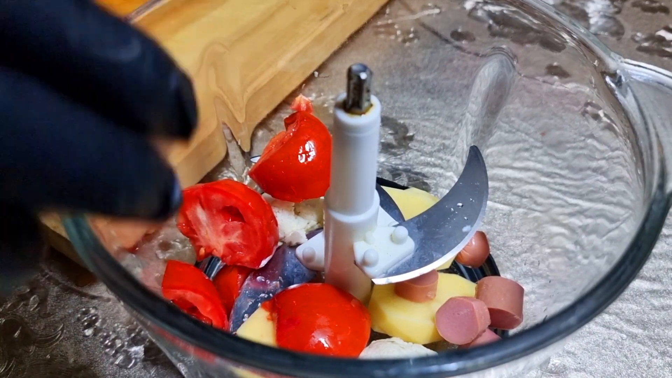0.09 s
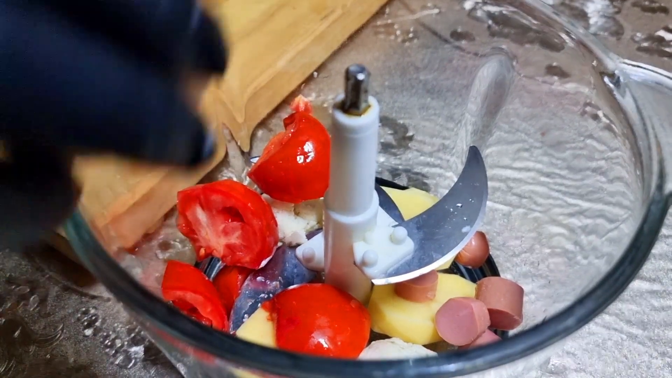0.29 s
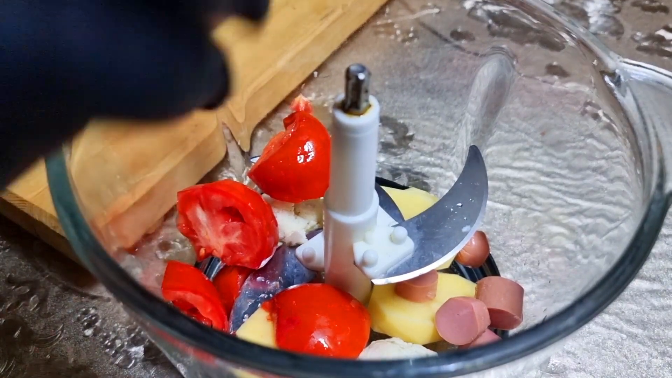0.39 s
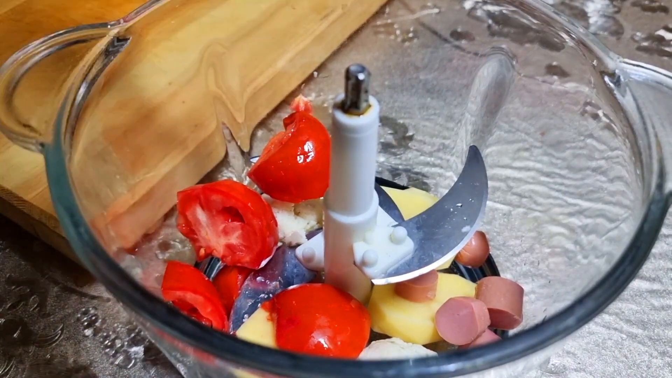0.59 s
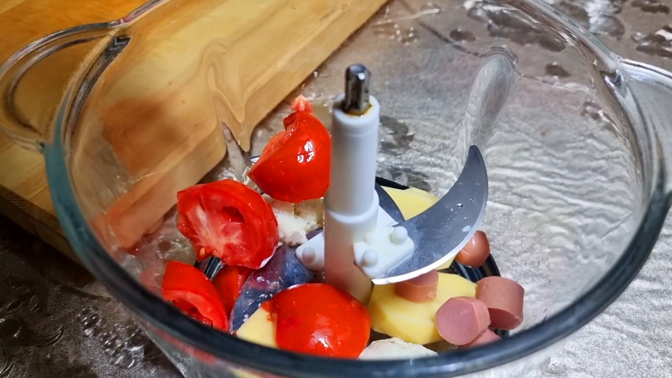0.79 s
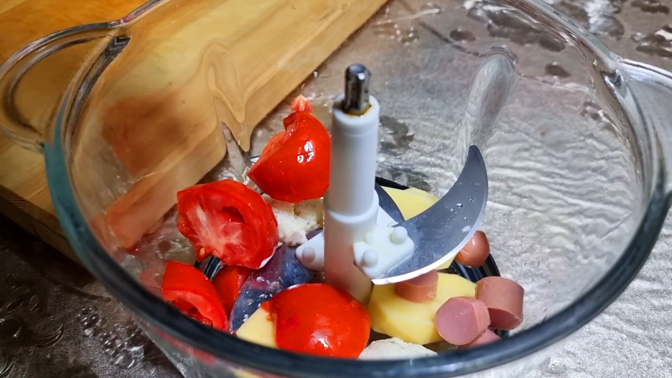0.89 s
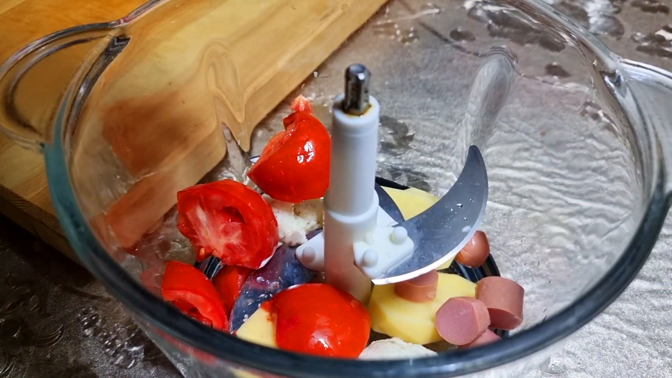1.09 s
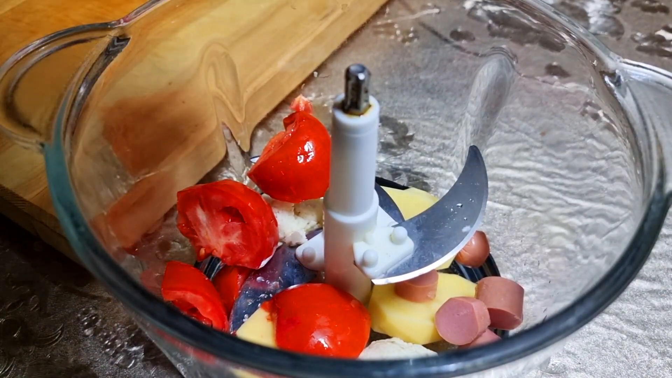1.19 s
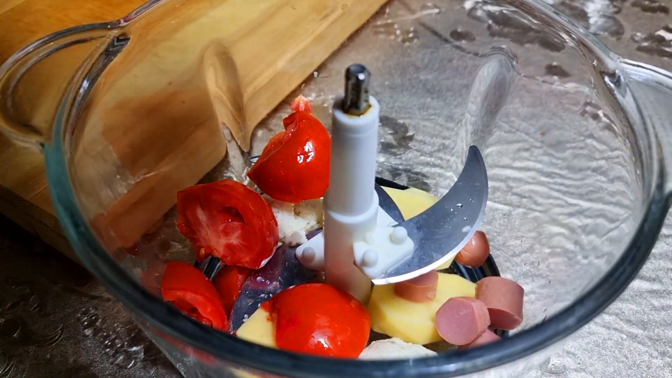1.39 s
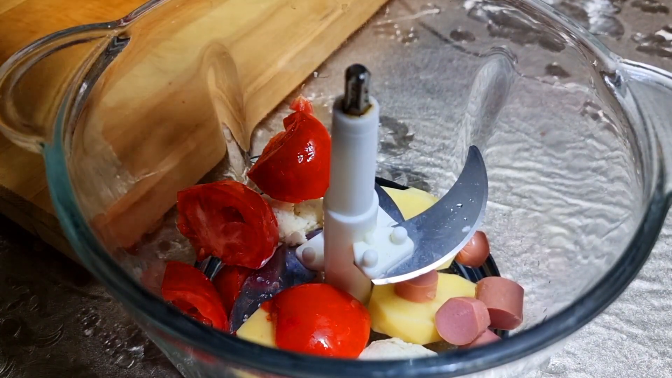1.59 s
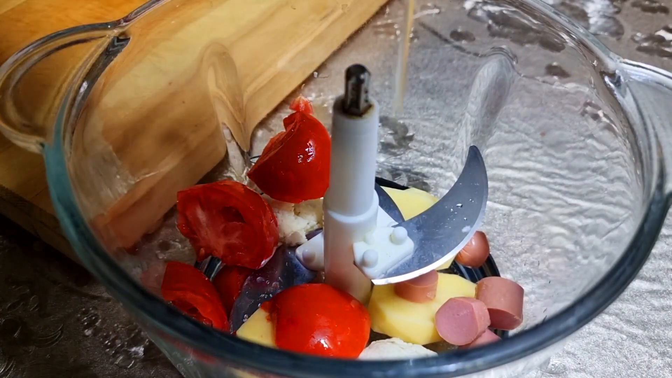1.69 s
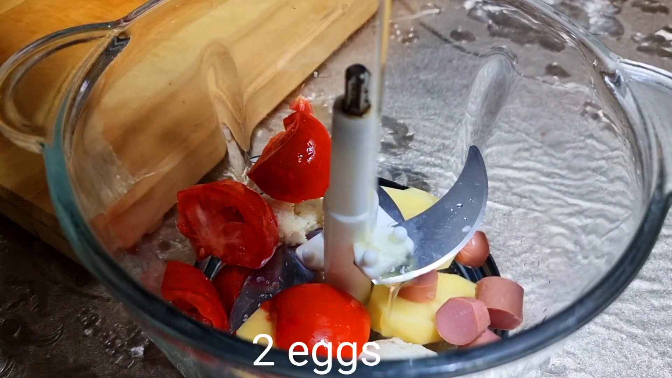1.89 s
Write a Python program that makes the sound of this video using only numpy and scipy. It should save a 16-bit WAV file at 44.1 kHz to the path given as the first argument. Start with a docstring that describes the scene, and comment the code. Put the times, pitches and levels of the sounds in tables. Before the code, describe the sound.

Close up in a quiet, softly hissing kitchen, two quick egg knocks make a glass bowl clink and ring, the second with a crisp crack; about a second later the shell crackles apart in short bursts.

```python
"""A quiet kitchen hisses softly, made of coloured noise, with faint rubs as fingers shift on an egg.
The egg is knocked twice on the rim of a glass chopper bowl: fading sine waves make the glass ring, its
lowest pair beating, over a noisy clatter and a worktop thump. The second knock breaks the shell.
About a second later thumbs pull the shell apart in short runs of dry snaps, each a click with a noisy
crumble that rings a small piece of shell."""
import sys
import numpy as np
from scipy import signal
from scipy.fft import rfft, irfft, next_fast_len
from scipy.io import wavfile

SR = 44100
rng = np.random.default_rng(int(sys.argv[2]) if len(sys.argv) > 2 else 0)


def dump(signal):
    """Clip the signal to [-1, 1] and save it as 16-bit WAV at the path in sys.argv[1]."""
    limited = np.clip(np.atleast_2d(signal).T, -1, 1)
    pcm = np.round(limited * 32767).astype(np.int16)
    wavfile.write(sys.argv[1], SR, pcm)


N = 83790
T = np.arange(N) / SR  # time of every sample [s]

# Knocks of the egg on the rim: (time [s], worktop thump level [dB], shell crack level [dB])
KNOCKS = [(0.2164, -20, -26), (0.3864, -20, -8)]
AIR_SIDE_DB = 2  # left-right opposed part of the air and finger noise, against the shared part


def from_db(db):
    """Turn decibels into a gain."""
    return 10 ** (np.asarray(db) / 20)


def rms_one(x):
    """Scale to an rms (average strength) of one."""
    return x / np.sqrt(np.mean(x ** 2) + 1e-20)


def since(s):
    """Seconds passed since a moment, zero before it."""
    return np.maximum(T - s, 0)


def ring_out(t, rise_s, t60):
    """Quick swell, then a steady fall of 60 dB every t60 seconds."""
    swell = 1 - np.exp(-t / rise_s)
    return swell * from_db(-60 * t / t60)


def panned(pan_db):
    """Left and right gains that differ by pan_db."""
    return from_db(np.array([[.5], [-.5]]) * pan_db)


def stereo_noise(side_db, size):
    """White noise: one part shared by left and right, one part opposed."""
    mid, side = rng.standard_normal((2, size))
    return rms_one(mid + from_db(side_db) * side * np.array([[1], [-1]]))


def colour(x, points, tilt_db=0):
    """Filter through (Hz, dB) points, tilted per octave, with no sound ahead of time; white noise keeps its level."""
    n = 2 * next_fast_len(x.shape[-1])
    octave = np.log2(np.maximum(np.arange(n // 2 + 1) * SR / n, 1))
    hz, db = np.transpose(points)
    tilted_db = db + tilt_db * np.log2(hz / hz[0])
    gain = rms_one(from_db(np.interp(octave, np.log2(hz), tilted_db)))
    # Folding the cepstrum forward in time gives the minimum-phase filter with this gain
    cepstrum = irfft(np.log(gain))
    cepstrum[1:n // 2] *= 2
    cepstrum[n // 2 + 1:] = 0
    response = np.exp(rfft(cepstrum))
    return irfft(rfft(x, n) * response)[..., :x.shape[-1]]


def add(out, s, sound):
    """Mix a short sound in at a moment, cut off at the end of the scene."""
    i = min(int(s * SR), N - 1)
    out[:, i:i + sound.shape[-1]] += sound[:, :N - i]


def air():
    """Room air: steady noise, coloured into a hiss with a little low rumble."""
    # Tone of the room air: (frequency [Hz], relative level [dB])
    air_tone = [(25, -9), (60, -6.5), (110, 5), (180, -6.5), (400, -3.5), (800, 6.5), (1500, 2.5),
                (2600, 1.5), (4200, 3.5), (7000, -2.5), (10000, -4), (11500, -25.5), (16000, -33)]
    level_db = -64
    return from_db(level_db) * colour(stereo_noise(AIR_SIDE_DB, N), air_tone)


def fingers():
    """Fingers sliding on the shell: faint bell-shaped swells of coloured noise."""
    # Rubs: (time of the middle [s], width [s], level [dB])
    rubs = [(.125, 0.023, -59.5), (.585, 0.014, -69), (.79, 0.034, -66), (.908, 0.013, -58),
            (1.04, 0.021, -66.5), (1.11, 0.018, -70.5)]
    # Tone of the rubbing: (frequency [Hz], relative level [dB])
    rub_tone = [(60, -3), (115, 8.5), (220, -11.5), (1500, -3), (5000, 4), (9000, 1), (12000, -21.5),
                (16000, -14)]
    level = sum(from_db(db) * np.exp(-.5 * ((T - s) / width) ** 2) for s, width, db in rubs)
    return level * colour(stereo_noise(AIR_SIDE_DB, N), rub_tone)


def worktop():
    """The bowl shoves the worktop: low modes ring from each knock, and a soft thump peaks just after it."""
    # Worktop modes: (frequency [Hz], first knock level [dB], second knock level [dB], 60 dB fall time [s])
    worktop_modes = [(88, -31, -28, .22), (109.5, -22.5, -23, .26), (215, -20, -31, .24),
                     (240.6, -21, -40.5, 0.25), (385.2, -19, -26.5, 0.074)]
    thump_hz, thump_delay_s, thump_width_s = 130, 0.01315, .0042
    out = np.zeros(N)
    for k, (s, thump_db, _) in enumerate(KNOCKS):
        late = T - s - thump_delay_s  # time from the middle of the thump
        bump = np.exp(-(late / thump_width_s) ** 2)
        out += from_db(thump_db) * bump * np.cos(2 * np.pi * thump_hz * late)
        for hz, first_db, second_db, t60 in worktop_modes:
            level = from_db((first_db, second_db)[k]) * ring_out(since(s), 1 / hz, t60)
            out += level * np.cos(2 * np.pi * hz * late)
    return out


def clatter():
    """Many well-damped modes of bowl, blade and worktop: short noise bands, the lows swelling more slowly."""
    # Clatter: (frequency [Hz], first knock level [dB], second knock level [dB], 60 dB fall time [s],
    #           left-right likeness [-1 to 1])
    table = np.array([(45, -61.5, -58, 0.25, .9), (84, -31.5, -32.5, 0.24, .98),
                      (124, -32, -22.5, 0.24, 0.97), (175, -35, -36.5, .27, 0.98),
                      (239.2, -30.5, -37, .27, .9), (337, -35, -37.5, .25, 0.69),
                      (470, -22.5, -39, 0.12, 0.049), (670, -16.5, -26, 0.074, -0.27),
                      (940, -21, -30, 0.082, -.5), (1370, -28.5, -27.5, 0.086, -0.38),
                      (1898, -33, -23.5, 0.079, -0.25), (2760, -44, -33.5, 0.12, -0.18),
                      (3840, -32.5, -18, 0.046, -0.52), (5463, -43.5, -44.5, 0.066, -0.62),
                      (7680, -29, -21, .07, 0.075), (10880, -43, -28, 0.035, -0.31),
                      (15480, -63, -43.5, .04, 0)])
    rise_cycles = 0.52
    out = np.zeros((2, N))
    for hz in 42.5 * 2 ** np.arange(0, 9, .5):  # half-octave steps
        # Read the table between its rows
        *levels_db, t60, alike = [np.interp(np.log(hz), np.log(table[:, 0]), c) for c in table.T[1:]]
        alike = np.clip(alike, -1, 1)
        band = signal.butter(2, [hz / 2 ** .25, hz * 2 ** .25], "band", fs=SR, output="sos")
        white = rng.standard_normal((2, N))
        mid, side = rms_one(signal.sosfilt(band, signal.sosfilt(band, white)))
        shared = np.sqrt((1 + alike) / 2) * mid
        opposed = np.sqrt((1 - alike) / 2) * side * np.array([[1], [-1]])
        noise = shared + opposed
        for row, db in zip(KNOCKS, levels_db):
            out += noise * from_db(db) * ring_out(since(row[0]), rise_cycles / hz, t60)
    return out


def glass():
    """Each knock rings the bowl's modes as fading sines; the second contact damps what is left of the first."""
    # Bowl modes: (frequency [Hz], first knock level [dB], second knock level [dB], 60 dB fall time [s],
    #              left minus right level [dB], left phase lead [rad])
    bowl_modes = [(828.7, -8.5, -24, 1, -5, -3), (848, -16.5, -24, 0.92, 1.5, 1.96),
                  (2020, -37, -29, 0.59, 4.5, -1.89), (2188.4, -42.5, -32.5, 0.5, -5.5, 0.4),
                  (3641, -28, -31.5, 0.3, -16, -2.5), (4098, -18, -14.5, 0.21, -11.5, -1.5),
                  (5820, -41, -43, 0.17, -3, 0), (6210, -35.5, -29.5, .11, -8, 0.5),
                  (6470, -31.5, -28, 0.17, -5, -2.5), (7135, -32.5, -20.5, 0.1, 7.5, 1.33),
                  (7700, -38.5, -36, .11, -2.5, -1.5), (7530, -30.5, -28.5, 0.13, -9.5, -1.76),
                  (7971, -41, -40, .11, 1.5, 1), (8670, -36.5, -25, 0.12, 6, -3.5),
                  (9253, -38, -28.5, .13, 4.5, 1.8), (9440, -45.5, -30, 0.22, 0, -2.5),
                  (9930, -32.5, -27.5, 0.041, 1, 1.5), (11420, -43, -37.5, 0.064, 3, -5.5),
                  (11950, -62, -35.5, .07, 2, 1.5), (12620, -47, -48.5, .075, 6, 7.5),
                  (13360, -50.5, -39, 0.078, 1, -3.5), (13980, -51.5, -41.5, .07, 3, 0.5),
                  (14700, -68, -41, .075, 1, 4)]
    rise_s, contact_damp_s = .0015, 0.0032
    out = np.zeros((2, N))
    starts = [row[0] for row in KNOCKS]
    damping = [np.exp(-since(starts[1]) / contact_damp_s), 1]
    for k, s in enumerate(starts):
        t = since(s)
        for hz, first_db, second_db, t60, pan_db, lead in bowl_modes:
            level = from_db((first_db, second_db)[k]) * ring_out(t, rise_s, t60) * damping[k]
            phase = 2 * np.pi * hz * t + np.array([[lead], [0]])
            out += panned(pan_db) * level * np.sin(phase)
    return out


def snap(crumble_s, hz, ring_s, tilt_db):
    """One fracture: a click and a crumble of tiny breaks ring a piece of shell, with a faint room tail."""
    # Tone of the shell: (frequency [Hz], relative level [dB])
    shell_tone = [(150, -33.5), (500, -13), (800, -12), (1200, -2.5), (2300, -2), (3700, 0), (5500, 2),
                  (7500, -3), (10000, -1.5), (12500, -20.5), (16000, -19)]
    crumble_db, spread_db, side_db = -8.5, 5.5, -0.5
    room_db, room_t60_s = -32, .11
    ring_db, low_cut_hz = -18, 380
    t = T[:SR // 6]
    # Tiny breaks of uneven size
    spread = np.clip(rng.standard_normal(len(t)), -2, 2)
    sizes = rms_one(from_db(spread_db * spread))
    force = from_db(crumble_db) * sizes * stereo_noise(side_db, len(t)) * np.exp(-t / crumble_s)
    force[:, 0] = 1  # the click
    force += from_db(room_db) * stereo_noise(0, len(t)) * ring_out(t, crumble_s, room_t60_s)
    # The piece of shell is a resonator: r is its fade and w its phase step, per sample
    r = np.exp(-1 / (ring_s * SR))
    w = 2 * np.pi * hz / SR
    piece = signal.lfilter([1, -r * np.cos(w)], [1, -2 * r * np.cos(w), r * r], force)
    toned = colour(force + from_db(ring_db) * piece, shell_tone, tilt_db)
    low_cut = signal.butter(2, low_cut_hz, "high", fs=SR, output="sos")
    return signal.sosfilt(low_cut, toned)


def eggshell():
    """The shell cracks on the rim, faintly then loudly, and later snaps as it is pulled open."""
    # Snaps: (time [s], level [dB], crumble fade time [s], pitch of the shell piece [Hz],
    #         its ring fade time [s], treble tilt [dB per octave], left minus right level [dB])
    snaps = [(1.265, -49, 0.0041, 3480, .0006, -3, 7.5), (1.2771, -22.5, 0.0018, 6170, 0.00059, 1, 2),
             (1.2831, -28.5, 0.0033, 2800, 0.00091, -1, 2.5), (1.3020, -46, 0.0024, 5600, .0005, 2, -14),
             (1.3610, -40.5, 0.0015, 7000, 0.0017, 2, 4), (1.4066, -42, .0014, 6000, .0005, -2, -3),
             (1.4136, -34, 0.0019, 2800, 0.00076, -2.5, 10.5), (1.419, -39, 0.0042, 2330, 0.00092, -1, 0),
             (1.433, -34.5, 0.0038, 2860, 0.0014, -1.5, 4.5), (1.4578, -47, 0.0013, 4960, 0.00046, -3, 7),
             (1.4680, -41, .0015, 8900, .0005, -3.5, -4), (1.4861, -25, 0.0015, 5280, 0.00052, -3, 9.5),
             (1.488, -28, 0.0058, 1200, 0.00078, -2, -5), (1.4985, -29, 0.0026, 4500, .0006, -3.5, 6),
             (1.5030, -35.5, 0.0025, 3080, 0.00095, -2.5, -11.5),
             (1.5090, -40.5, 0.0044, 1370, 0.00058, -3, 15), (1.5265, -40.5, 0.0024, 1400, 0.0009, -1.5, 0),
             (1.6884, -52.5, 0.0011, 8770, .0008, 3.5, -2.5), (1.7098, -31, 0.0017, 4800, .0012, -1.5, 3.5),
             (1.7138, -29, 0.0021, 4280, 0.0042, -2, -8.5), (1.718, -28.5, 0.0026, 5780, .0015, -3, 8),
             (1.7270, -31.5, 0.0025, 1380, 0.001, -1.5, 3), (1.7576, -44, 0.00091, 3790, 0.0011, 1, -5),
             (1.8759, -13.5, 0.00099, 2380, 0.0014, 3, 2.5),
             (1.8814, -21.5, 0.001, 3554, 0.0058, 0.5, -5.5), (1.8975, -29, 0.0042, 3450, .003, 2, 2)]
    out = np.zeros((2, N))
    for s, _, crack_db in KNOCKS:
        crack = snap(crumble_s=.0015, hz=9600, ring_s=0.0019, tilt_db=6.5)
        add(out, s, from_db(crack_db) * crack)
    for s, db, crumble_s, hz, ring_s, tilt_db, pan_db in snaps:
        add(out, s, from_db(db) * panned(pan_db) * snap(crumble_s, hz, ring_s, tilt_db))
    return out


def scene():
    """Room, fingers, worktop, bowl and egg together."""
    return air() + fingers() + worktop() + clatter() + glass() + eggshell()


def record(dry):
    """Round the peaks gently, then cut the very top of the treble."""
    peak_limit, cut_hz = 1.85, 16700  # 60 dB down from cut_hz upward
    rounded = peak_limit * np.tanh(dry / peak_limit)
    top_cut = signal.cheby2(16, 60, cut_hz, fs=SR, output="sos")
    return signal.sosfilt(top_cut, rounded)


dry = scene()
out = record(dry)
dump(out)
```